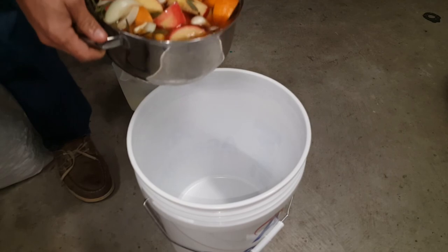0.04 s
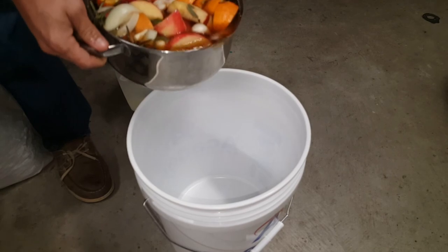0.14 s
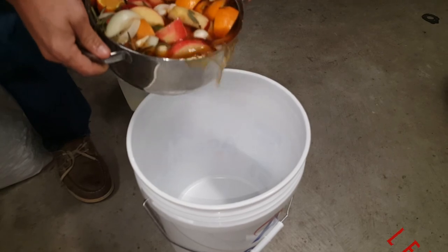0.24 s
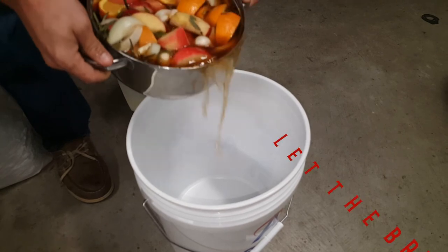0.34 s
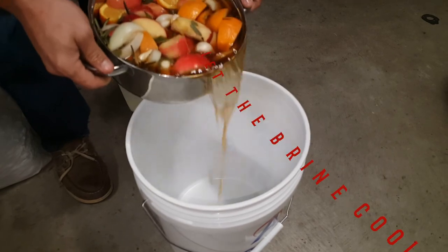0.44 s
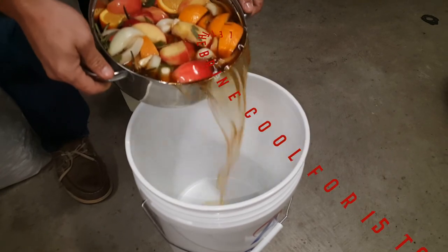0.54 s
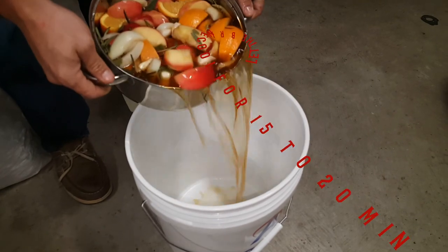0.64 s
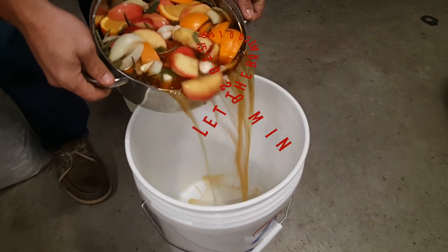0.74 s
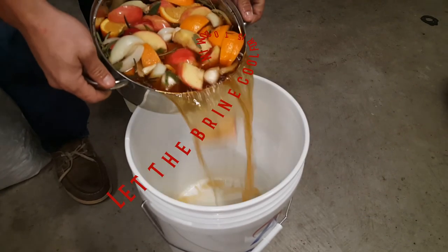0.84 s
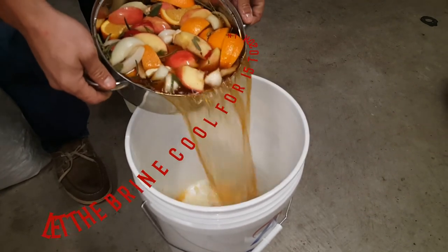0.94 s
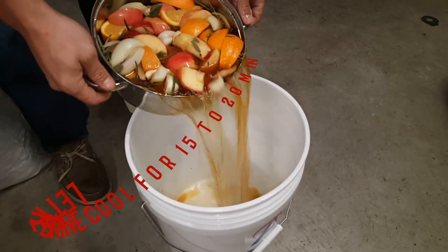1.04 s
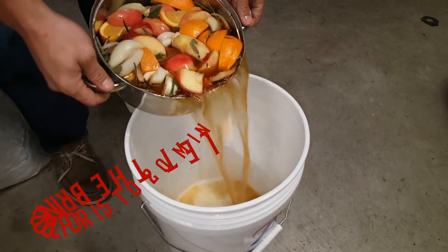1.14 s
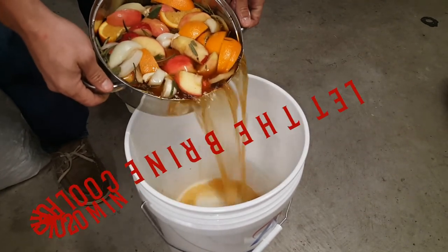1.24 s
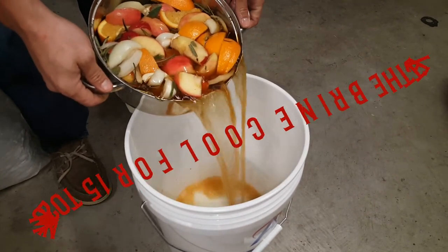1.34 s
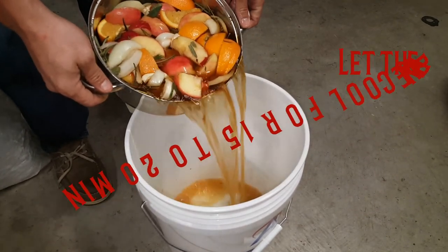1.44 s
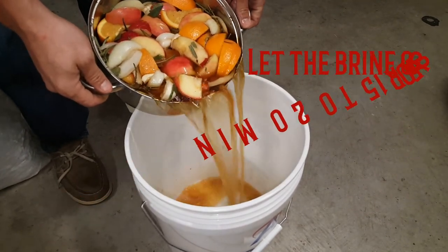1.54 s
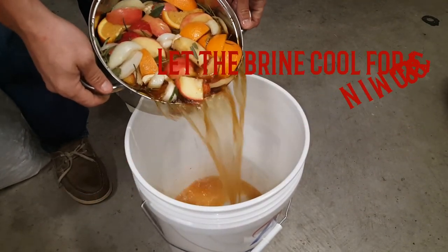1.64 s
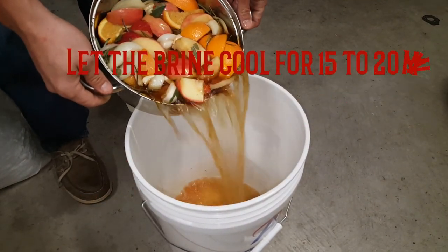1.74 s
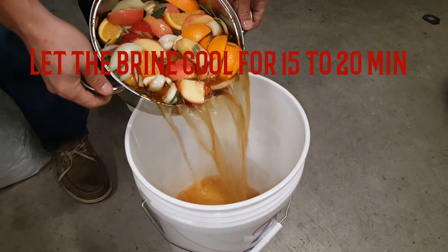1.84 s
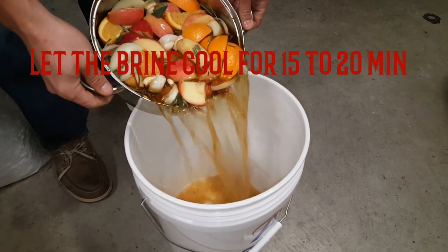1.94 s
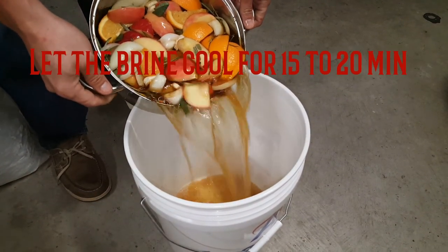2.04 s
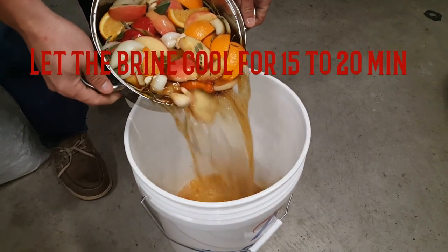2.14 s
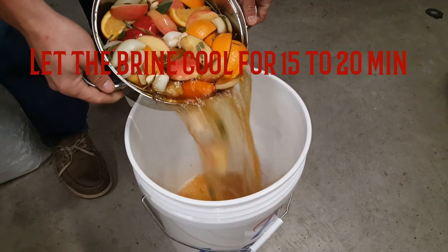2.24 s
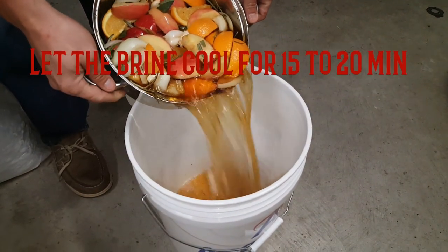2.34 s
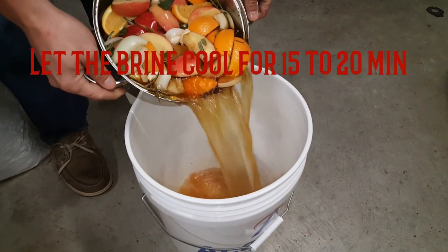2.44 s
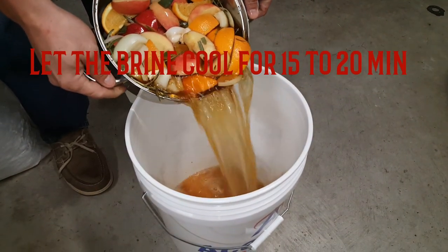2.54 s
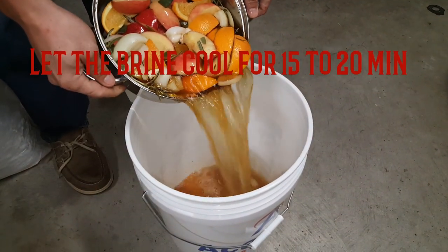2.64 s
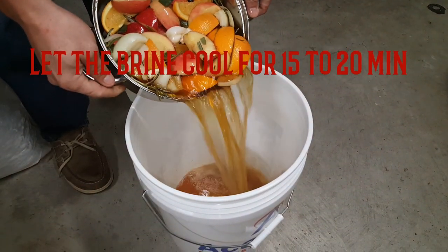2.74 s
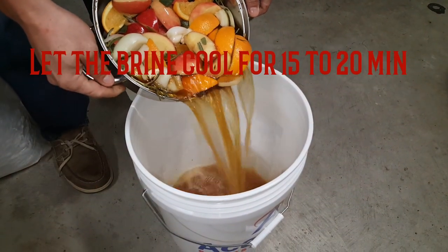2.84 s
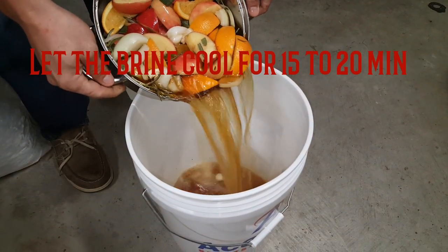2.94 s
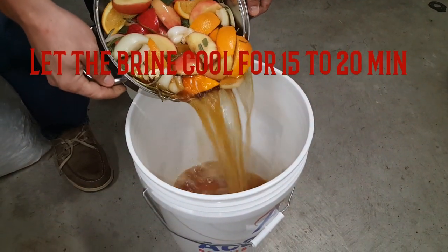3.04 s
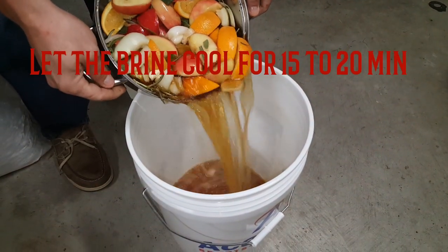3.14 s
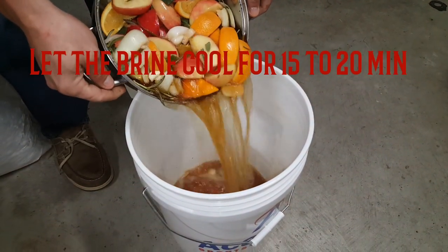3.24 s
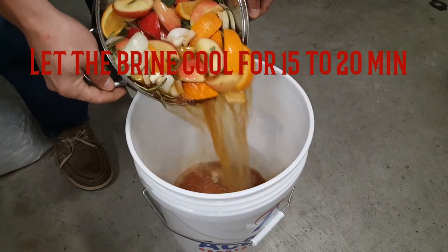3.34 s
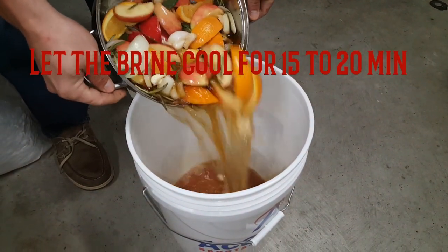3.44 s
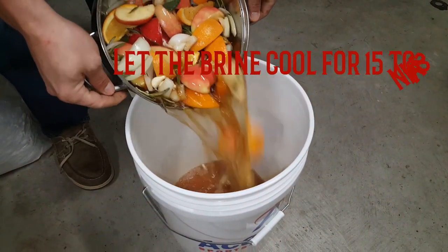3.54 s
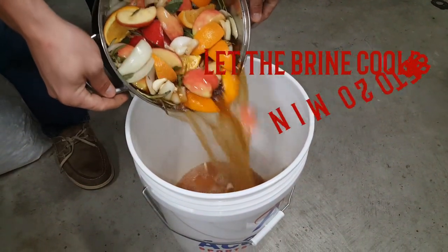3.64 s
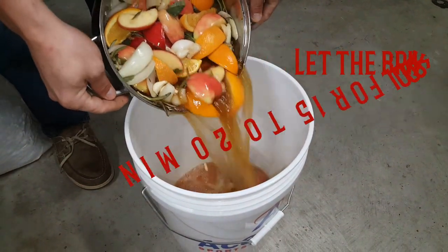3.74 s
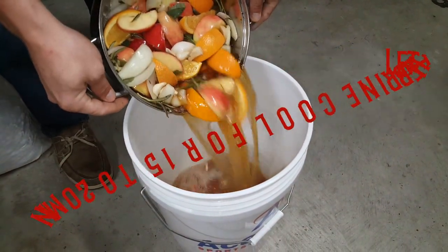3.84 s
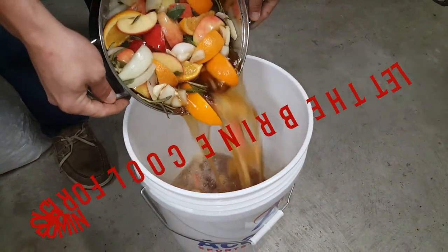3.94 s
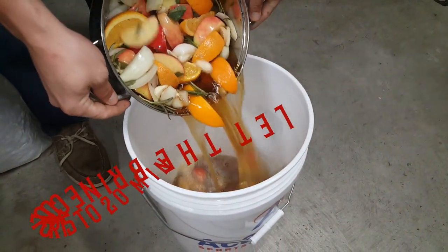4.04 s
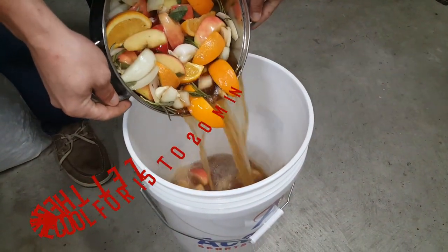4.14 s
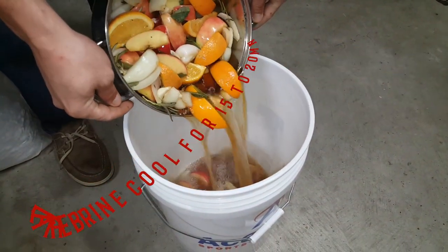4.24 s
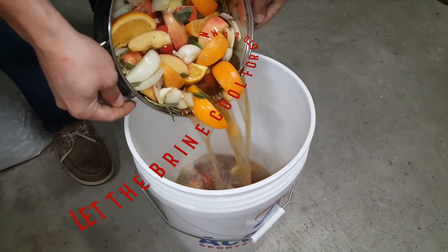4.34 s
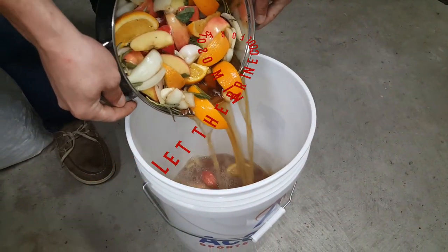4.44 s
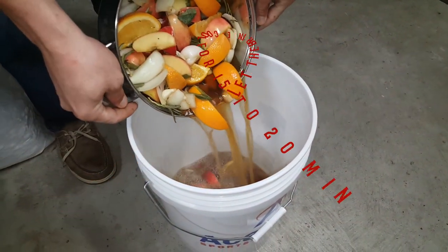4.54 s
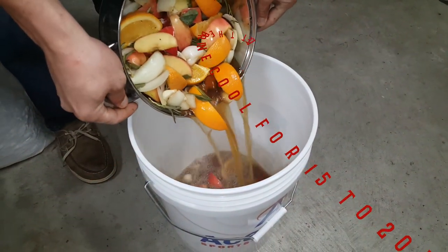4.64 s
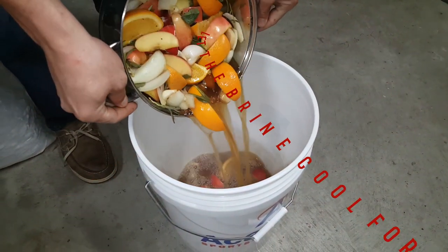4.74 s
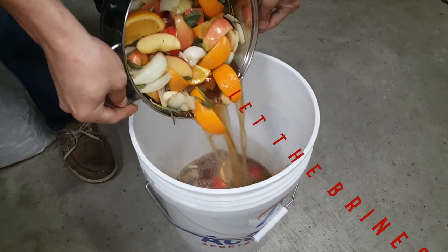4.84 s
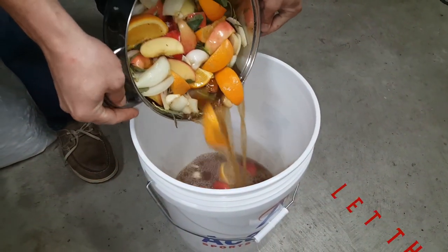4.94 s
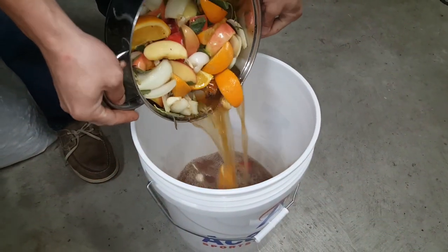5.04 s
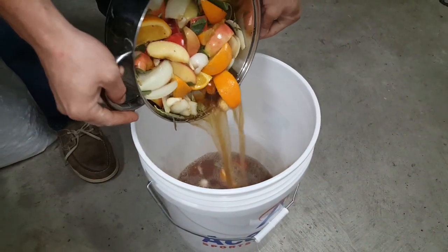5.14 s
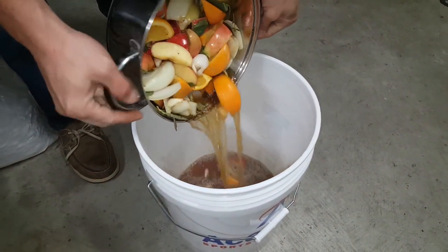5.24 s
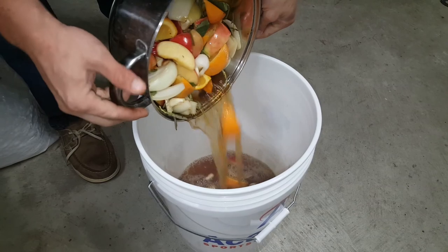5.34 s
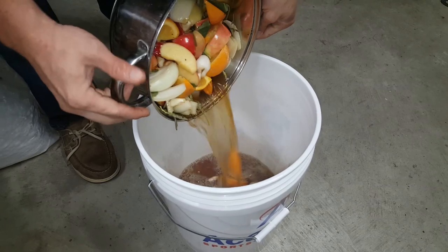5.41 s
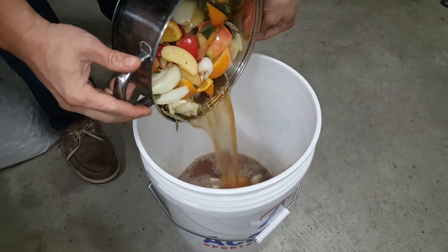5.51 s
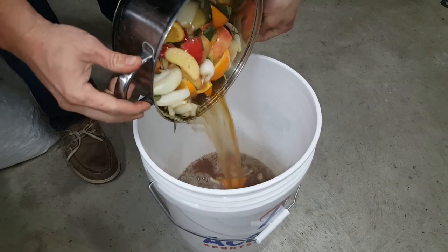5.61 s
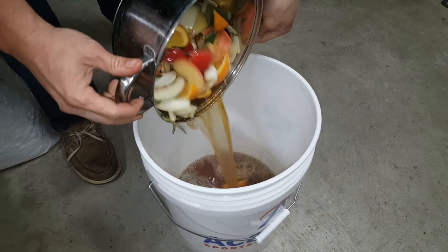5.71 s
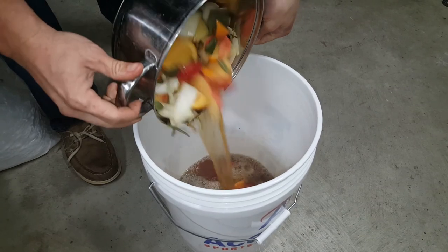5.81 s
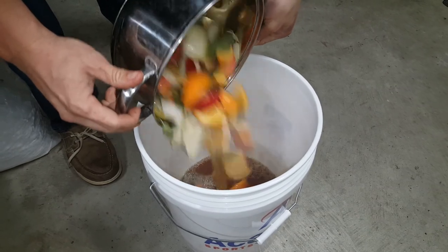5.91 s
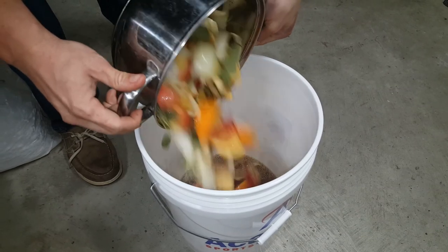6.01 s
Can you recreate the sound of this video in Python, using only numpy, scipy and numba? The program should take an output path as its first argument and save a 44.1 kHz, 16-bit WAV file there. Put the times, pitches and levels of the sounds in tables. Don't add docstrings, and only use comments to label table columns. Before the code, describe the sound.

After half a second of near silence with faint ventilation, liquid begins to splatter into an empty plastic bucket on a concrete floor. The stream hisses and drums on the bottom, with bright drops ticking on the walls. Fruit chunks drop in with loud hollow thuds and wet slaps, first just after one second, then at two and a half and around four. Splashing softens into a pool. Close stereo microphone, lightly echoing workroom.

```python
import sys
import numpy as np
from scipy import signal
from scipy.fft import rfft, irfft
from scipy.io import wavfile
from scipy.ndimage import uniform_filter1d
from numba import njit

SR = 44100
rng = np.random.default_rng(int(sys.argv[2]) if len(sys.argv) > 2 else 0)


def dump(signal):
    limited = np.clip(np.atleast_2d(signal).T, -1, 1)
    pcm = np.round(limited * 32767).astype(np.int16)
    wavfile.write(sys.argv[1], SR, pcm)


def how_loud(loudness_db):
    steps = np.asarray(loudness_db, float) / 20
    return 10 ** steps


N = 267687
TIME = np.arange(N) / SR
FREQ = np.maximum(np.fft.rfftfreq(N, 1 / SR), 1)
OPPOSITE = np.array([[1], [-1]])
LANDS_S, WETS_S = 0.577, 0.13
FILL_S = (2.04, 2.29)


def unit(x):
    return x / np.sqrt(np.mean(x ** 2))


def colour(x, points):
    hz, db = np.transpose(points)
    gain_db = np.interp(np.log(FREQ), np.log(hz), db)
    return irfft(rfft(x) * how_loud(gain_db), N)


def walk(rate):
    k = int(SR / rate)
    held = np.repeat(rng.standard_normal(N // k + 1), k)
    return 1.175 * uniform_filter1d(uniform_filter1d(held, k), k)[:N]


def resonate(x, modes):
    total = 0
    for k, (hz, width, db) in enumerate(modes):
        b, a = signal.iirpeak(hz, hz / width, SR)
        total = total + (-1) ** k * how_loud(db) * signal.lfilter(b, a, x)
    return total


@njit
def grains(start, hz, t60, size, glide, turn, rise):
    out = np.zeros((2, N))
    for k in range(len(start)):
        z, g = size[k] + 0j, 1.
        w, r, q = 2 * np.pi * hz[k] / SR, np.exp(-6.9 / (t60[k] * SR)), np.exp(1j * turn[k])
        fade, steps = np.exp(-1 / (rise[k] * SR)), int(t60[k] * SR)
        for i in range(int(start[k]), min(N, int(start[k]) + steps)):
            z *= r * np.exp(1j * min(w, 2.6))
            w *= 1 + glide[k] / steps
            g *= fade
            out[0, i] += (1 - g) * z.imag
            out[1, i] += (1 - g) * (z * q).imag
    return out


def ring(s, hz, t60, db, glide=0., turn=0., rise=0.0017):
    columns = np.broadcast_arrays(s * SR, hz, t60, how_loud(db), glide, turn, rise)
    return grains(*(1. * c.ravel() for c in columns))


def bursts(s, db, length):
    env, t = np.zeros(N), np.arange(SR // 2) / SR
    for at, top, span in zip((s * SR).astype(int), how_loud(db), length):
        shape = top * (1 - np.exp(-t / 0.00016)) * np.exp(-(t / span) ** 0.83)
        env[at:at + len(t)] += shape[:N - at]
    return env


# frequency in Hz, level in dB per Hz.
ROOM_TONE = [(12, -29), (20, -1), (22, -10), (32, -28), (145, -1), (198, -15), (309, -6.5), (386, -14.5),
             (657, -12.5), (1150, -22.5), (2060, -24), (10700, -45), (15900, -45)]


def room_tone():
    mid, side = rng.standard_normal((2, N))
    side = colour(side, [(100, -17), (1500, 1.5)])
    return unit(colour(mid + side * OPPOSITE, ROOM_TONE)) * how_loud(-53 + 1.0 * walk(3.6))


# start in seconds, peak in dB, pitch in Hz.
SLUGS = [(0.576, -23, 210.6), (0.672, -21, 225.2), (0.719, -19, 206.2), (0.801, -22.5, 211),
         (0.892, -26.5, 199.6), (0.957, -18.5, 204.4), (1.367, -25, 214), (3.3, -25, 215.5),
         (1.547, -31, 215), (1.604, -23.5, 210.8), (1.648, -32, 194), (1.688, -20, 219),
         (1.726, -23.5, 196.6), (1.873, -28.5, 198.7), (1.958, -28.5, 199.8), (2.161, -23, 200.6),
         (2.2, -23.5, 201.8), (2.262, -19, 202.6), (2.33, -32.5, 184.7), (2.383, -24, 190),
         (2.688, -24, 194), (2.878, -25.5, 208), (3.118, -23.5, 224.3), (4.598, -24, 217.8),
         (5.111, -31, 212.7), (2.65, -42, 212), (1.297, -26, 192.3), (1.419, -32, 216.6)]
# start in seconds, peak in dB, pitch in Hz, ring t60 in seconds,
# bottom plate share in dB.
CHUNKS = [(0.621, -15, 209.3, 0.13, 0.5), (1.1453, -1, 216.3, 0.091, -3), (1.171, -8.5, 243, 0.086, -7),
          (1.196, -10.5, 231.8, 0.14, -22), (1.24, -13, 200.4, 0.1, -3), (1.444, -11, 228.6, 0.037, -19),
          (1.459, -14.5, 213.3, 0.057, -19), (1.471, -12.5, 272.5, 0.046, -17),
          (1.486, -19.5, 232, 0.045, -22), (1.28, -17, 214.5, 0.07, -11), (2.431, -18, 203.5, 0.17, -28),
          (2.514, 0.5, 199.5, 0.062, -1), (2.534, -12.5, 244.6, 0.1, 9), (2.557, -15.5, 246.2, 0.063, -8),
          (2.572, -12.5, 206.3, 0.14, 0.5), (3.788, -12.5, 211, 0.26, -4), (3.83, -12, 210.1, 0.094, -21),
          (3.94, -5.5, 218.7, 0.15, -8), (4.176, -16, 222.2, 0.12, -7.5), (4.233, -2.5, 217.6, 0.12, -2),
          (4.294, -3.5, 209.9, 0.2, -15), (4.353, -7.5, 212.3, 0.096, -28.5), (4.406, -21.5, 217, 0.5, -19),
          (4.279, -12.5, 200.7, 0.062, -17), (4.66, -15.5, 215.8, 0.15, -19),
          (5.268, -17.5, 221, 0.14, -13.5), (1.267, -17.5, 220, 0.1, -14), (2.462, -17, 215.1, 0.14, -16),
          (5.156, -25.5, 211, 0.24, -18), (5.334, -28, 232.3, 0.36, -7), (5.499, -29, 207.5, 0.3, -8),
          (5.638, -24.5, 211.4, 0.18, -2.5), (5.719, -30, 223, 0.26, -10), (5.986, -30.5, 235, 0.19, -7.5),
          (3.99, -15, 224.7, 0.2, -24), (4.064, -24.5, 222.2, 0.2, -28), (2.0, -22.5, 206.9, 0.33, -12),
          (2.945, -25.5, 222.3, 0.21, -16), (2.901, -23.5, 185.5, 0.093, 2)]


def blows():
    slugs = [(s, db, hz, 0.2804, -4.5 - 0.7 * s) for s, db, hz in SLUGS]
    return np.transpose(slugs + CHUNKS)


# times in seconds, pitch in Hz.
AIR_HUM = (0.6, 1.63, 2.255, 2.8, 6.0), (211, 208, 199, 214, 220)


def air_column(s, db, hz, t60):
    drum = flow()[0]
    env, t = 1.073 * drum * how_loud(2.2 * walk(15)), np.arange(SR // 3) / SR
    pitch = np.interp(TIME, *AIR_HUM) + 4 * walk(10.5)
    for at, top, tone, span in zip((s * SR).astype(int), how_loud(db), hz, t60 / 4.12):
        shape = top * (1 - np.exp(-t / 0.0029)) * np.exp(-(t / span) ** 1.88)
        shape = shape[:N - at]
        part = slice(at, at + len(t))
        pitch[part] = np.where(shape > env[part], tone, pitch[part])
        env[part] = np.maximum(env[part], shape)
    hum = env * np.sin(2 * np.pi * np.cumsum(pitch) / SR)
    return colour(hum, [(80, -16), (150, -0.5)])


# frequency in Hz, width in Hz, level in dB.
AIR_MODES = [(190, 33, -1.5), (217, 26, 3.5), (243, 30, -1.5), (275, 31, -5), (326.2, 13, -9.5)]
# frequency in Hz, width in Hz, level in dB.
PLATE_MODES = [(92, 7.9, 0.5), (131.3, 19, -1), (165, 14.3, 5)]
# times in seconds, level in dB.
SIDE_MODES = (3, 2), (-11, -11.5)
# times in seconds, level in dB.
LOW_PLATE = (0.83, 3, 1, 10.5, 5.2), (0, -28, -26, -12, 7.47)


def thuds():
    s, db, hz, t60, plate_db = blows()[:, :, None]
    air, plate = np.array(AIR_MODES)[[0, 2, 3, 4]], np.array(PLATE_MODES)
    calm_db = np.interp(s, *SIDE_MODES)
    air_db = db + air[:, 2] + calm_db + 3 * rng.standard_normal((len(s), len(air)))
    side_modes = ring(s, air[:, 0], 1.2 * t60, air_db, turn=0.37, rise=0.006)
    lowest_db = np.interp(s, *LOW_PLATE) * (plate[:, 0] == plate[0, 0])
    bottom_db = db + plate_db + 1.46 * plate[:, 2] - 5.0 + lowest_db
    bottom = ring(s, plate[:, 0], t60, bottom_db, turn=0.23, rise=0.014)
    slosh = unit(colour(rng.standard_normal(N), [(200, -25), (300, 4.5), (600, 9.0), (1000, -32.0)]))
    slosh = slosh * bursts(s[:, 0], (db - 11.5 + calm_db)[:, 0], t60[:, 0] / 5.2)
    return air_column(s[:, 0], db[:, 0] - 0.7, hz[:, 0], t60[:, 0]) + side_modes + bottom + slosh


# start in seconds, peak in dB, bubble pitch in Hz, sizzle over 7 kHz in dB.
SPLASHES = [(0.7191, -9.5, 4250, -18), (0.802, -9.5, 4370, -14), (1.008, -8, 4140, -17),
            (1.101, -9, 2320, -17), (1.274, -12.5, 4700, -11), (1.529, -10, 4090, -37),
            (2.013, -11.5, 3640, -17), (2.118, -12.5, 3340, -26), (2.244, -12.5, 4300, -15.5),
            (2.415, -15, 2860, -12), (2.461, -10.5, 3300, -19), (2.684, -15.5, 3600, -17),
            (2.921, -13.5, 3885, -15), (3.018, -13, 4400, -15), (3.107, -10, 2924, -17.5),
            (3.187, -8.5, 4220, -17), (3.391, -11.5, 4100, -34.5), (3.45, -11, 4510, -50),
            (3.748, -10, 4090, -21), (3.7799, -6.5, 4130, -14), (3.926, -8, 3880, -12),
            (4.1605, -9.5, 3380, -9.5), (4.28, -10.5, 3960, -19), (5.136, -16.5, 4150, -34),
            (4.871, -14, 4820, -18), (5.259, -11.5, 3685, -10), (5.34, -14, 5520, -26),
            (5.374, -12.5, 2286, -20), (5.617, -13.5, 4480, -7), (5.695, -15, 4850, -21)]
# start in seconds, peak in dB, bubble pitch in Hz.
DROPS = [(0.576, -27, 3500), (0.731, -16, 5070), (0.816, -16, 6570), (1.995, -18, 1790), (0.619, -20, 4500),
         (0.653, -23, 3600), (0.914, -17, 4280), (1.116, -10.5, 2085), (1.381, -17.5, 5560),
         (1.51, -15, 4290), (1.658, -17, 5260), (5.468, -19.5, 4890), (4.739, -18, 3600),
         (1.9074, -16, 4100), (2.086, -18, 6030), (2.1731, -16.5, 2010), (2.359, -18.5, 5300),
         (2.543, -14.5, 4900), (2.731, -15.5, 3850), (3.168, -12.5, 2610), (2.876, -11.5, 3940),
         (3.056, -14.5, 3020), (3.657, -21.5, 3790), (3.844, -14, 3500), (3.996, -14, 4254),
         (4.536, -14, 4200), (4.8141, -17.5, 3436), (4.923, -16, 5780), (5.169, -16, 1860),
         (5.532, -14.5, 2318), (5.981, -20.5, 4920), (5.695, -18.5, 2673), (5.385, -18.5, 2300),
         (6.015, -16.5, 2270), (6.038, -15.5, 4050), (0.956, -13.5, 4280), (1.4455, -19, 3610),
         (1.789, -19.5, 4500), (2.2244, -20, 3630), (2.486, -14.5, 3600), (2.8134, -17, 3890),
         (3.372, -24.5, 4020), (4.429, -14, 2680), (4.485, -20.5, 3370), (4.566, -18.5, 2850),
         (4.6119, -18, 2790), (4.696, -19.5, 1914), (5.749, -18, 4300), (5.786, -20, 3463),
         (5.803, -23.5, 2690), (5.612, -14.5, 4080), (1.108, -13.5, 2640), (1.122, -15, 3200),
         (0.612, -28.5, 4970), (1.025, -16, 4100), (1.045, -14.5, 5120)]


def splashes(count=6):
    drops = [(s, db, hz, db - 2 + 13 * np.log2(hz / 4000) - s) for s, db, hz in DROPS]
    s, db, hz, sizzle_db = np.transpose(SPLASHES + drops)
    length = 0.012 * how_loud(0.3 * (db + 16.5)) * (hz / 3500) ** -0.4
    when, pitch, size, side = rng.random((4, len(s), count))
    follower = np.arange(count) > 0
    start = s[:, None] + length[:, None] * 1.4 * when * follower
    tone = hz[:, None] * np.exp(0.55 * (pitch - 0.4) * follower)
    bubble_db = db[:, None] - 3.5 - (4 + 6 * size) * follower
    bubbles = ring(start, tone, 0.017, bubble_db, glide=0.086, turn=5 * (side - 0.5), rise=0.0001)
    noise = rng.standard_normal((2, 2, N))
    splat = unit(colour(noise[0], [(1200, -8), (2400, -2.0), (6500, -6.5), (8500, -86)]))
    splat = splat * bursts(s, db - 14.5, length)
    sizzle = unit(colour(noise[1], [(5000, -5), (7500, 13.5), (12500, 2.5), (16000, -6)]))
    sizzle = sizzle * bursts(s, sizzle_db - 11.5, 0.83 * length)
    tick = unit(colour(noise[0, 0] + 0.25 * noise[1], [(700, -5), (2500, -7), (14000, -19)]))
    tick = tick * bursts(s, db - 9.5, np.full(len(s), 0.001))
    return bubbles + splat + sizzle + tick


# frequency in Hz, width in Hz, level in dB.
WALL_EMPTY = [(435, 36, -2.5), (575, 83, -3), (784, 21, 3), (860, 8.2, 6), (948, 44, 3), (1056, 130, -4.5),
              (1173, 55, -0.5), (1410, 270, -8)]
# frequency in Hz, width in Hz, level in dB.
WALL_FILLED = [(456.4, 50, -8), (544, 36, -3), (652, 48, -3.5), (772, 29, 5), (953, 167, -1),
               (1284, 105, -2.5), (1383, 54, 2.5), (2040, 1000, -11)]


def rattle(shake):
    mid, side = rng.standard_normal((2, N)) * shake
    push = mid + colour(side, [(400, -8.5), (800, -8.5), (1400, -1.5)]) * OPPOSITE
    fill = np.interp(TIME, FILL_S, (0, np.pi / 2))
    return unit(resonate(push, WALL_EMPTY)) * np.cos(fill) + unit(resonate(push, WALL_FILLED)) * np.sin(fill)


# start in seconds, peak in dB, main pitch in Hz, ring t60 in seconds.
SLAPS = [(0.577, -21.5, 854, 0.13), (0.652, -22, 834, 0.22), (0.729, -24, 587, 0.28),
         (0.852, -21, 974, 0.048), (1.172, -18.5, 445, 0.35), (1.148, -10, 565, 0.049),
         (1.373, -35, 993, 0.038), (1.446, -6.5, 857, 0.088), (1.548, -15, 980, 0.041),
         (2.106, -25, 1160, 0.21), (3.452, -25.5, 1350, 0.29), (4.664, -22.5, 432, 0.17),
         (2.463, -13.5, 945, 0.055), (2.513, -9, 600, 0.023), (2.814, -16.5, 815, 0.027),
         (2.684, -25, 1410, 0.04), (3.116, -19.5, 778, 0.068), (3.189, -26, 905, 0.079),
         (3.742, -17.5, 1355, 0.2), (3.782, -13.5, 964, 0.096), (3.938, -14.5, 739, 0.057),
         (4.163, -18, 1258, 0.068), (4.184, -14, 769, 0.15), (4.233, -17.5, 775, 0.12),
         (4.29, -13.5, 793, 0.076), (4.66, -17.5, 999, 0.11), (5.089, -17, 671, 0.048),
         (5.377, -23, 763, 0.089), (5.629, -10.5, 744, 0.038), (5.7, -24.5, 1415, 0.14),
         (1.447, -10.5, 1230, 0.071), (2.516, -14, 1222, 0.03), (2.53, -17.5, 820, 0.14),
         (2.585, -31, 964, 0.037), (4.187, -15, 612, 0.081), (4.6, -24, 756, 0.086),
         (4.625, -25.5, 1007, 0.16), (4.365, -24, 750, 0.096), (5.632, -33, 486, 0.092),
         (1.15, -19, 825, 0.051), (0.579, -26, 445, 1), (0.581, -31, 988, 0.42), (2.145, -21.5, 963, 0.15),
         (2.24, -20.5, 926, 0.063), (2.35, -24, 834, 0.09), (3.95, -25.5, 759, 0.23),
         (4.236, -17, 1360, 0.045), (1.374, -20.5, 1360, 0.056), (5.637, -12.5, 796, 0.041)]
# start in seconds, peak in dB, pitch in Hz,
# ring t60 in seconds.
MORE_SLAPS = [(0.811, -29, 1000, 0.45), (0.99, -24.5, 784, 0.44), (1.096, -18, 999, 0.17),
              (2.525, -19, 929, 0.12), (2.868, -19, 873, 0.1), (3.06, -33, 939, 0.21),
              (2.549, -21.5, 460, 0.094), (2.471, -17.5, 801, 0.065), (2.475, -22, 1340, 0.059),
              (3.19, -24, 1330, 0.047), (3.38, -28, 782, 0.15), (3.495, -24.5, 776, 0.12),
              (3.61, -25.5, 765, 0.28), (4.662, -18, 690.5, 0.077), (4.845, -27, 787, 0.3),
              (4.92, -24.5, 520, 0.077)]
# start in seconds, peak in dB, pitch in Hz, ring t60
# in seconds.
LAST_SLAPS = [
    (1.461, -24, 1100, 0.04),
    (1.469, -21, 775, 0.04),
    (1.484, -16, 840, 0.036),
    (4.236, -19, 640, 0.082),
    (5.572, -24.5, 670, 0.057),
    (5.626, -19, 691, 0.029),
    (5.629, -25, 1392, 0.026),
    (5.654, -22, 774, 0.05),
]


def slaps():
    s, db, hz, t60 = np.transpose(SLAPS + MORE_SLAPS + LAST_SLAPS)[:, :, None]
    empty = s[:, :, None] < np.mean(FILL_S)
    modes = np.where(empty, np.array(WALL_EMPTY), np.array(WALL_FILLED))
    struck_db = db + modes[..., 2] - 14.0 + 3 * rng.standard_normal(modes.shape[:2])
    struck = ring(s, modes[..., 0], 0.32 * t60, struck_db, turn=0.1, rise=0.00033)
    main = ring(s, hz, t60, db - 3.5, turn=0.61, rise=0.00041)
    return main + struck + how_loud(-10.5) * bursts(s[:, 0], db[:, 0], t60[:, 0] / 4) * rattle(1)


# time in seconds, flow in dB, solidity of landing in dB (strands splash, a rope drums).
FLOW = [(0.6, -45, 11), (0.76, -33, 6), (0.86, -31.5, 1.5), (1.2, -30, 1), (1.56, -32, 0.5),
        (1.85, -32.5, 2.5), (2.001, -28, -0.5), (2.59, -27.5, -3.5), (2.752, -29.5, 2), (3.05, -26.5, -4),
        (3.46, -29, -9), (3.7, -26, -3), (4.4, -27.5, -10.5), (4.86, -33.5, -2), (5.088, -31, -4),
        (5.6, -32.5, -1.5), (5.87, -36, -5), (6.07, -35, -3)]


def flow():
    s, flow_db, solid_db = np.transpose(FLOW)
    jet = (TIME > LANDS_S) * how_loud(np.interp(TIME, s, flow_db))
    solid = how_loud(np.interp(TIME, s, solid_db))
    wet = np.clip((TIME - LANDS_S) / WETS_S, 0, 1) ** 3
    at, db = np.transpose(CHUNKS)[:2]
    slosh = bursts(at, db - 25.5, np.full(len(at), 0.05))
    drum = jet * solid * wet * how_loud(-5 - 0.15 * TIME) + slosh
    rumble = jet * solid * how_loud(-3.5 - 2 * TIME)
    return drum, rumble, jet * how_loud(-4), jet * wet


# frequency in Hz, level in dB per Hz.
SPRAY = [(710, -69), (1200, -35), (1380, -11), (1680, -7), (1770, -9.5), (3570, -3), (8390, -6.5),
         (10300, -13), (14000, -12), (15050, -25), (15500, -34)]


def spray(count=5500, size=4):
    when, pitch, weight = rng.random((3, count, 1))
    late, spread, share, side = rng.random((4, count, size))
    hz = np.minimum(1300 * 8.5 ** pitch * np.exp(0.556 * (spread - 0.5)), 15500)
    db = np.minimum(-2.0 * np.log(1 - weight), 7) - 8 * share
    start = when * N / SR + 0.008 * late ** 1.5
    drops = ring(start, hz, 1.1 / np.sqrt(hz), db, glide=0.03, turn=6 * side, rise=0.0003)
    hiss = rng.standard_normal((2, N)) * how_loud(2.0 * walk(29.63))
    white = colour(drops, [(1000, -3.5), (16000, 8.5)])
    return unit(colour(unit(white) * how_loud(-2.0) + hiss, SPRAY))


def stream():
    drum, rumble, wall, mist = flow()
    push = rng.standard_normal((2, N))
    air = how_loud(-2.0) * unit(resonate(push[0], AIR_MODES[:1] + AIR_MODES[2:]))
    bare = np.interp(TIME, (1.1, 1.7), (1.5, 0.35))
    plate = unit(bare * resonate(push[1], PLATE_MODES[:1]) + resonate(push[1], PLATE_MODES[1:]))
    return air * drum + plate * rumble + rattle(how_loud(3.1 * walk(40))) * wall + spray() * mist


def patter(count=330):
    when, size = rng.random((2, count))
    taps = np.zeros(N)
    tap_db = np.minimum(-4 * np.log(1 - size), 12) + 5 - 4.5 * when * N / SR
    taps[(when * N).astype(int)] = how_loud(tap_db)
    decay = signal.lfilter([1], [1, -np.exp(-1 / (0.0019 * SR))], taps)
    hiss = unit(colour(rng.standard_normal((2, N)), [(2500, -16), (6000, -7), (9000, 3.0), (15000, -4.0)]))
    return hiss * decay * flow()[2]


def glugs(count=260):
    when, pitch, size = rng.random((3, count))
    s = LANDS_S + when * (N / SR - LANDS_S)
    hz = 392 * (798 / 392) ** pitch
    db = 6 + np.interp(s, (4.6, 4.7), (-14, 0)) - 9 * size
    return ring(s, hz, 22 / hz, db, glide=0.13, turn=0.15, rise=0.00035) * flow()[3]


# start in seconds, peak in dB, pitch in Hz.
PINGS = [(0.64, -19, 11900), (0.6675, -17, 7340), (0.7542, -13, 10700), (0.848, -17, 7950),
         (1.254, -10, 5623), (1.3713, -14, 8600), (1.4317, -15, 8100), (1.488, -12, 7130),
         (1.6721, -21, 7280), (1.7662, -11, 7100), (1.8093, -14, 6200), (1.8533, -13, 6340),
         (1.893, -22, 5100), (1.9662, -13, 8300), (2.0009, -11, 8560), (2.1295, -8.5, 7950),
         (2.3157, -11, 5040), (2.9637, -12, 8210), (3.897, -9, 8370), (4.356, -13, 5300),
         (4.696, -16, 5140), (4.9238, -27, 7800), (5.021, -38, 5820), (5.041, -22, 5100),
         (5.3118, -22, 5310), (5.3605, -15, 6280), (5.447, -16, 8200), (5.5882, -8, 7740),
         (5.907, -17.5, 5300), (5.9837, -31, 5190)]


def pings():
    s, db, hz = np.transpose(PINGS)
    hiss = unit(colour(rng.standard_normal((2, N)), [(3500, -9), (6000, 0.5), (9000, -3.5), (15000, -12)]))
    tone = ring(s, hz, 0.014, db - 8, glide=0.04, turn=1.1, rise=0.00025)
    return tone + hiss * bursts(s, db - 12, np.full(len(s), 0.005))


@njit
def walls(x, lags, gain, damp):
    line, soft, out = np.zeros((8, 4096)), np.zeros(8), np.zeros((2, len(x)))
    for i in range(len(x)):
        total = 0.
        for k in range(8):
            soft[k] += (1 - damp) * (gain[k] * line[k, (i - lags[k]) & 4095] - soft[k])
            total += soft[k]
            out[k % 2, i] += soft[k]
        for k in range(8):
            line[k, i & 4095] = x[i] + soft[k] - total / 4
    return out


def scene():
    background = room_tone()
    bucket = thuds() + splashes() + slaps() + stream() + patter() + glugs() + pings()
    lags, room_t60_s = rng.integers(500, 2600, 8), 0.88
    echo = walls(bucket[0], lags, how_loud(-60 * lags / SR / room_t60_s), 0.097)
    side = colour((echo[0] - echo[1]) / 2, [(150, -13), (900, 2.0)])
    return bucket + how_loud(-20.5) * (echo.mean(axis=0) + side * OPPOSITE) + background


def band_limit(x):
    return signal.sosfilt(signal.butter(12, 15830, fs=SR, output="sos"), x)


# frequency in Hz, difference in dB.
TILT = [(100, 1.5), (300, 2), (1000, 0.9), (2800, 4), (5600, -0.5), (10000, -2.5), (15000, -1.5)]


def record(dry):
    left = colour(dry[0], [(hz, db / 2) for hz, db in TILT])
    right = colour(dry[1], [(hz, -db / 2) for hz, db in TILT])
    ports = np.array([left, right])
    ports = signal.sosfilt(signal.butter(2, 55., "high", fs=SR, output="sos"), ports)
    ports = 1.6 * np.tanh(ports / 1.6)
    ports = signal.sosfilt(signal.ellip(8, 0.5, 90, 15450, fs=SR, output="sos"), ports)
    return band_limit(ports)


dry = scene()
out = record(dry)
dump(out)
```